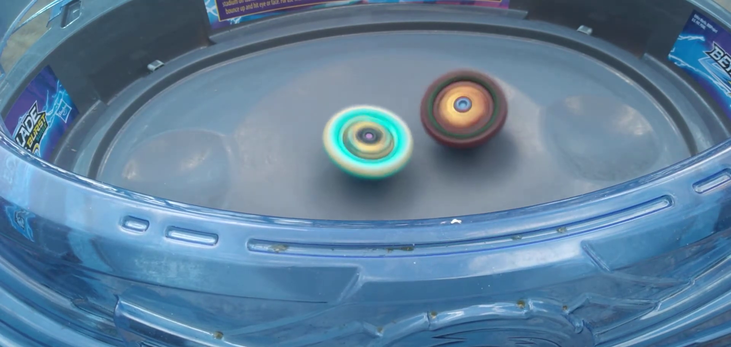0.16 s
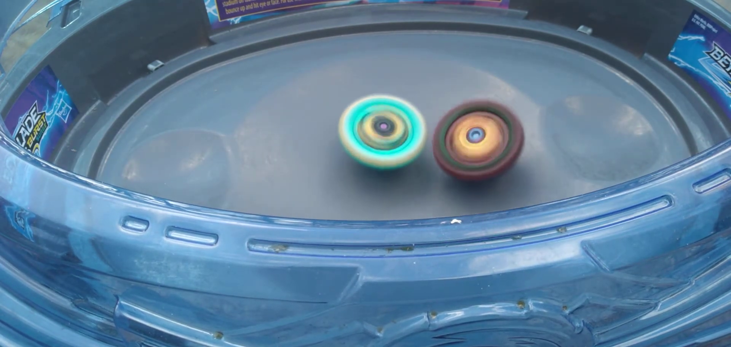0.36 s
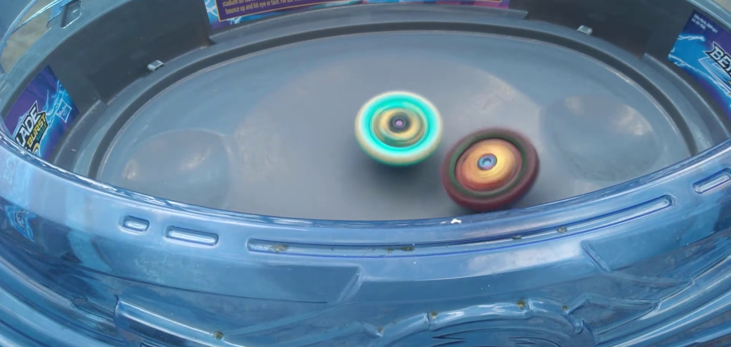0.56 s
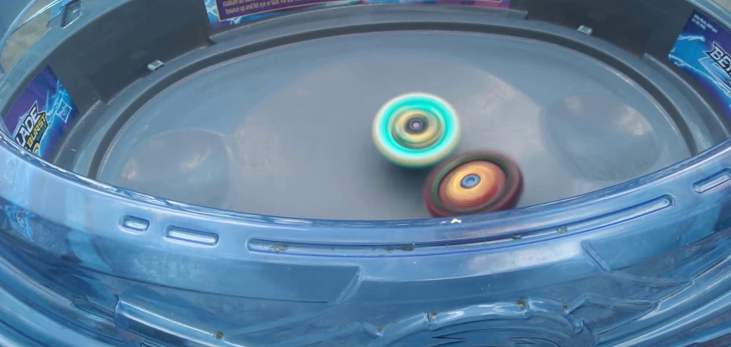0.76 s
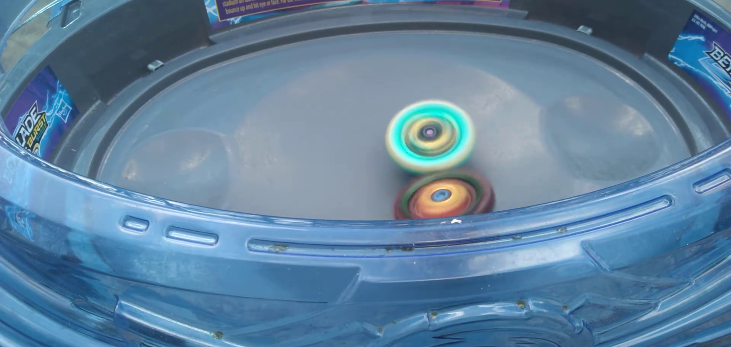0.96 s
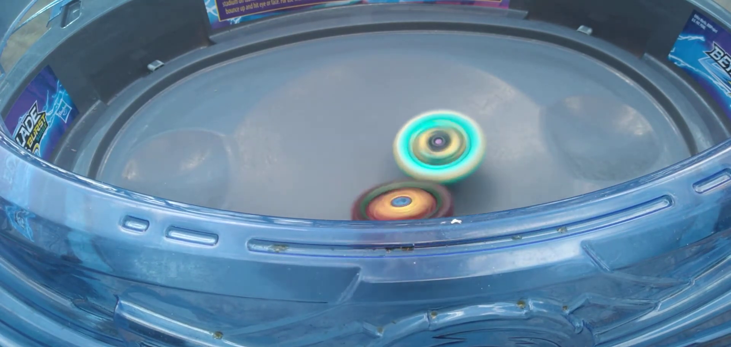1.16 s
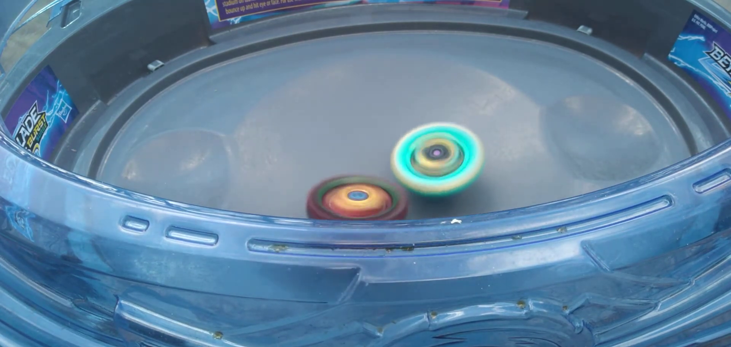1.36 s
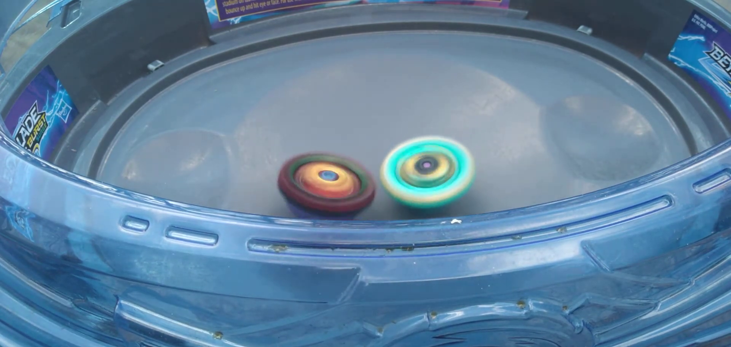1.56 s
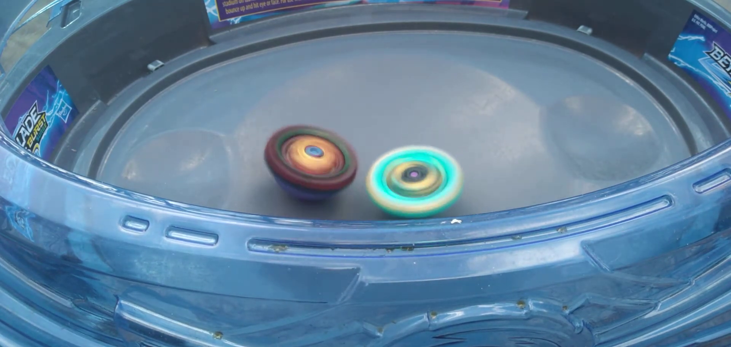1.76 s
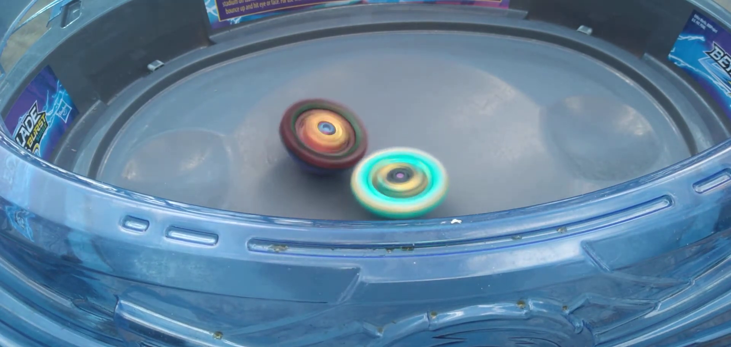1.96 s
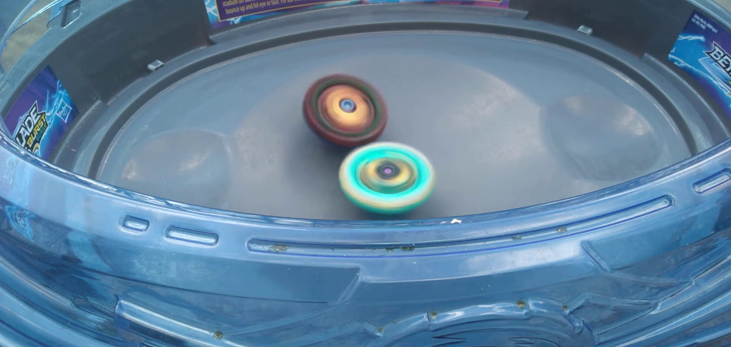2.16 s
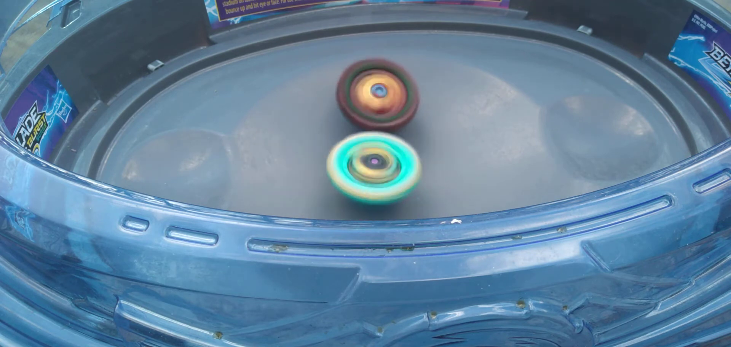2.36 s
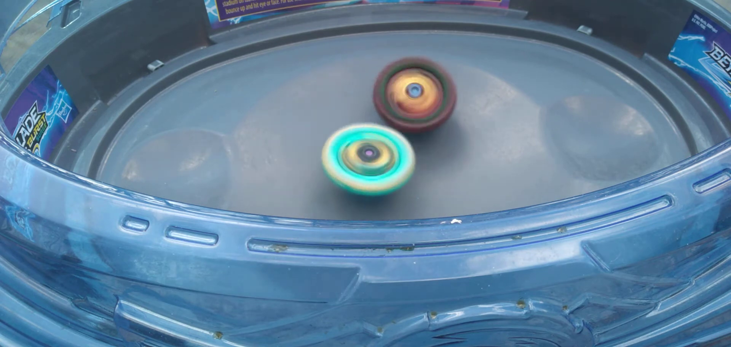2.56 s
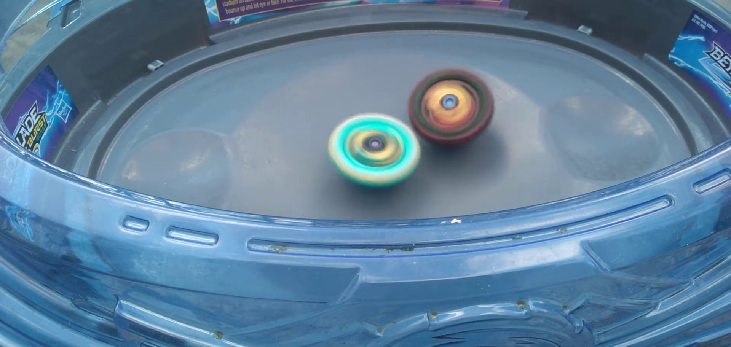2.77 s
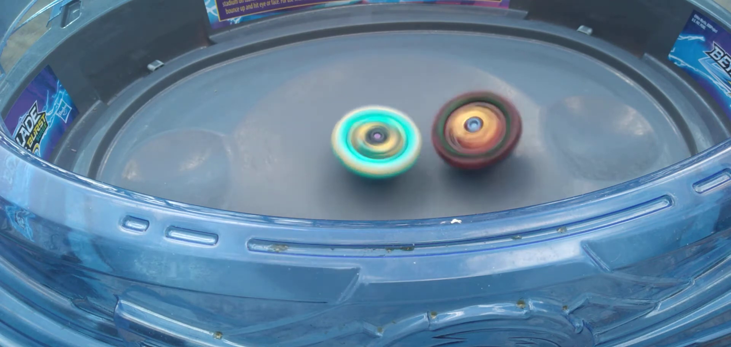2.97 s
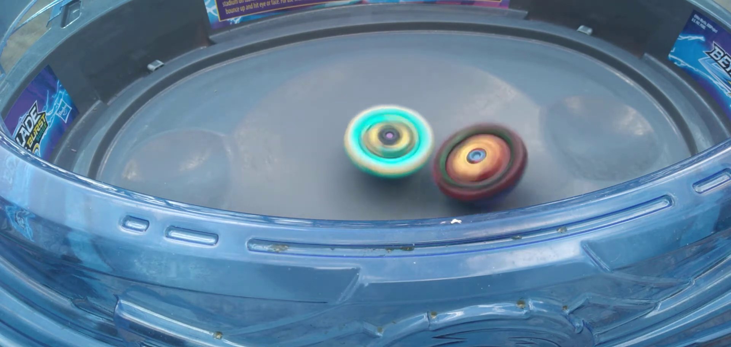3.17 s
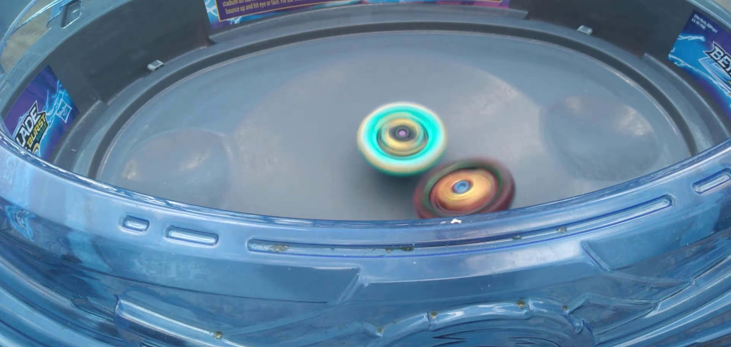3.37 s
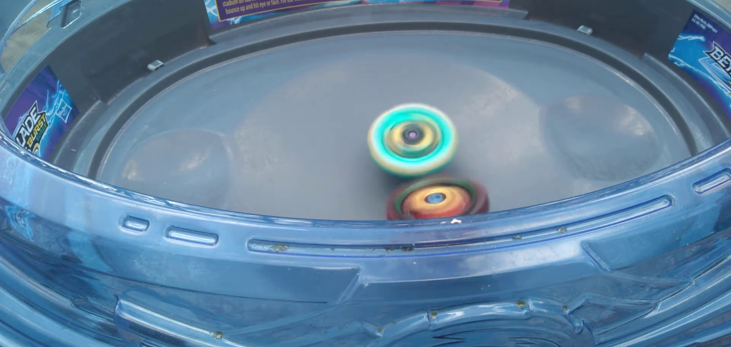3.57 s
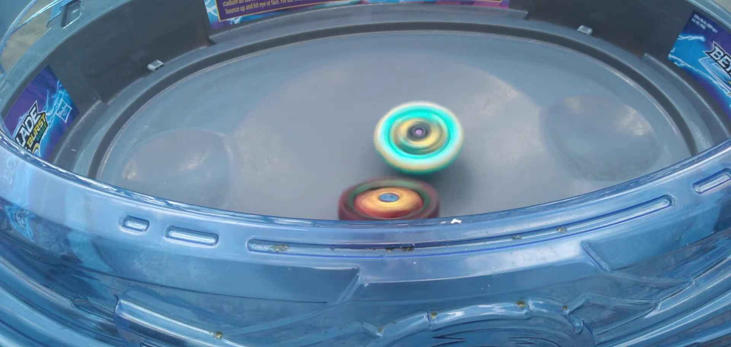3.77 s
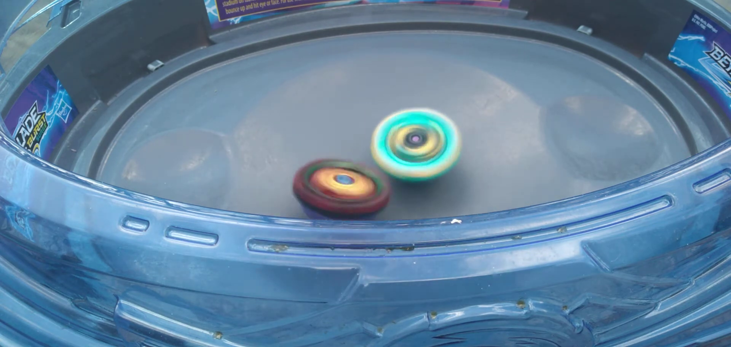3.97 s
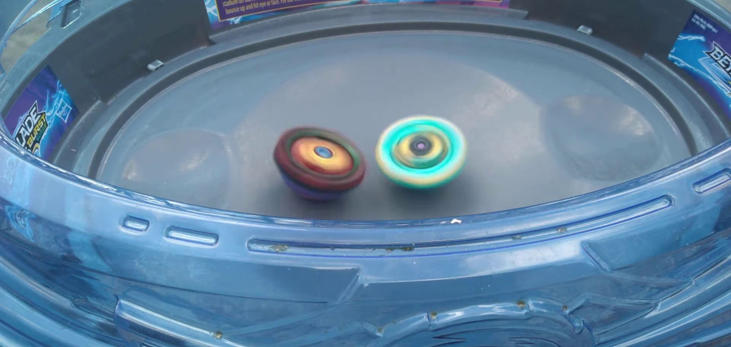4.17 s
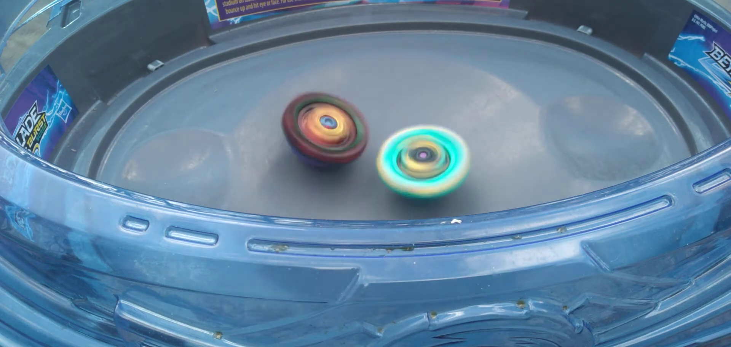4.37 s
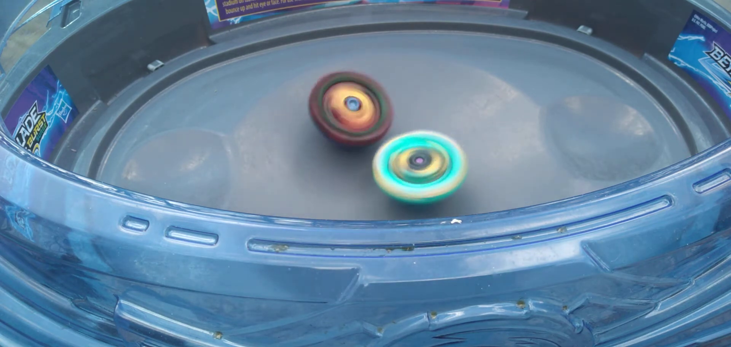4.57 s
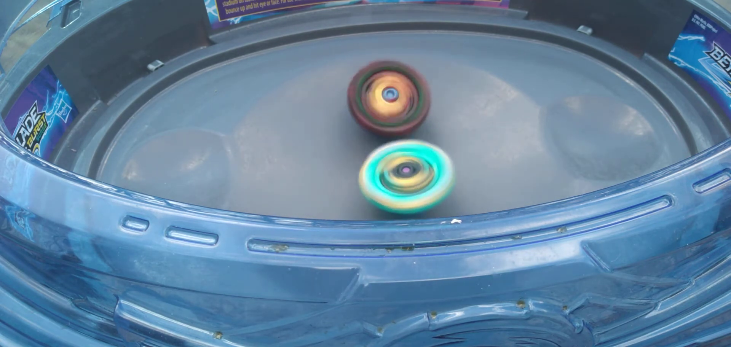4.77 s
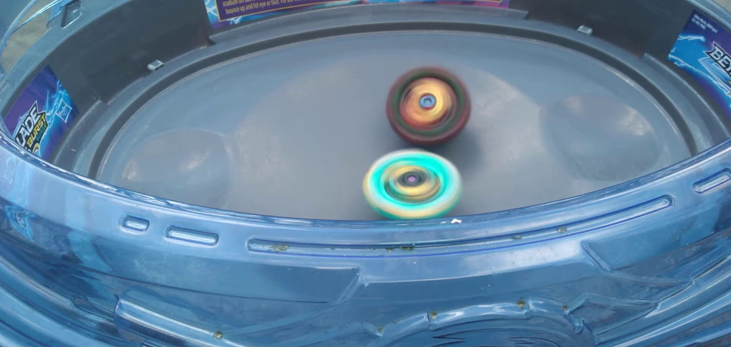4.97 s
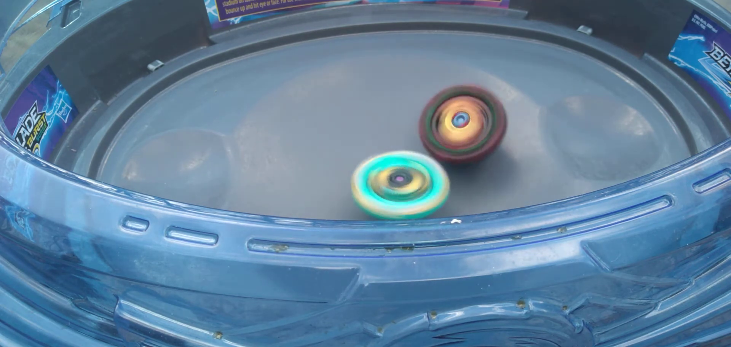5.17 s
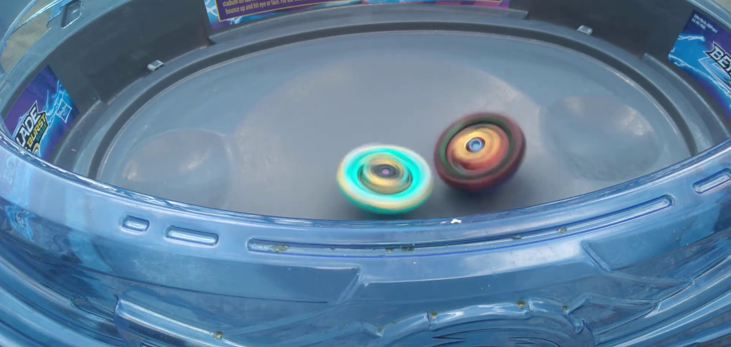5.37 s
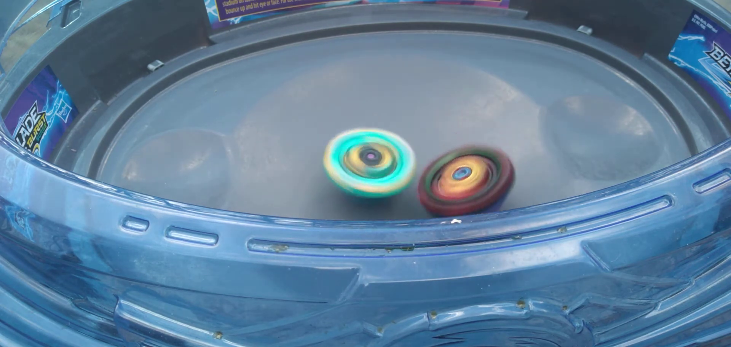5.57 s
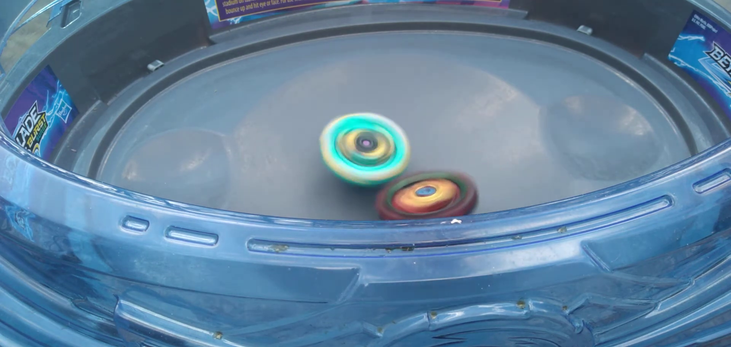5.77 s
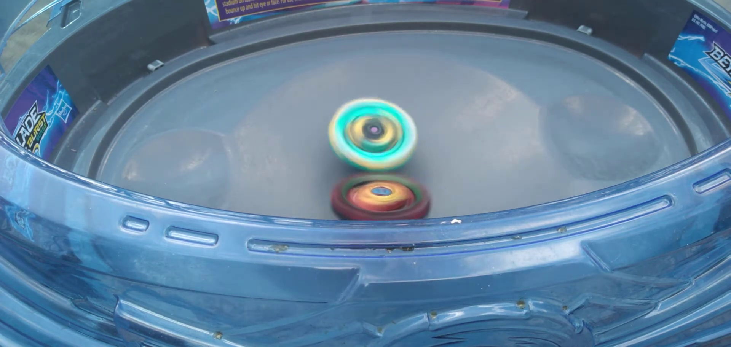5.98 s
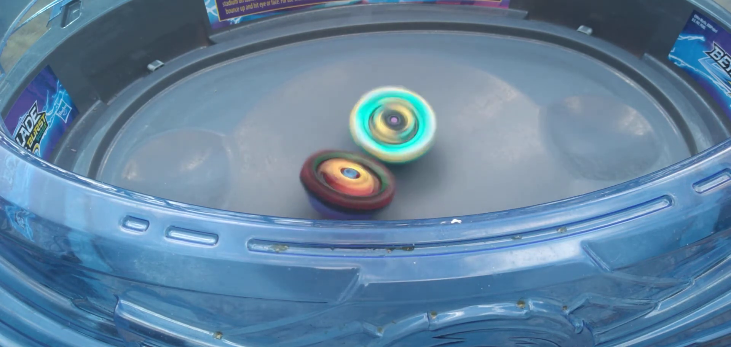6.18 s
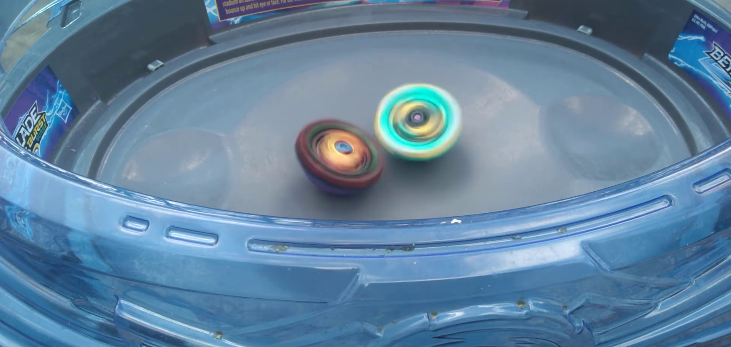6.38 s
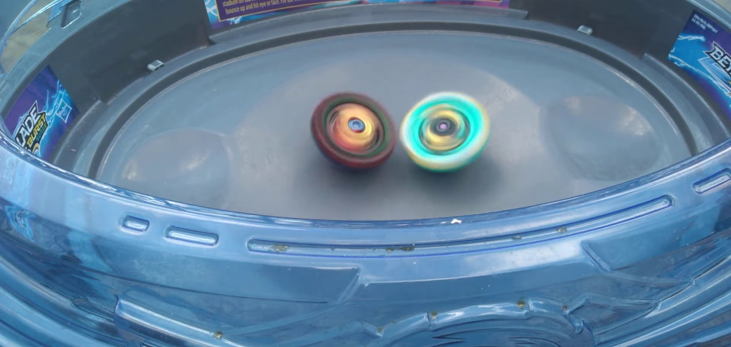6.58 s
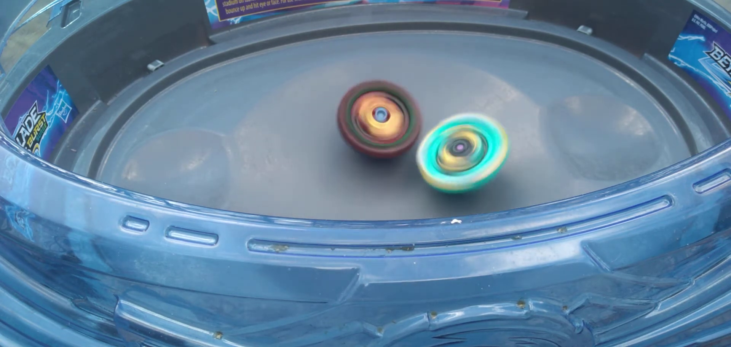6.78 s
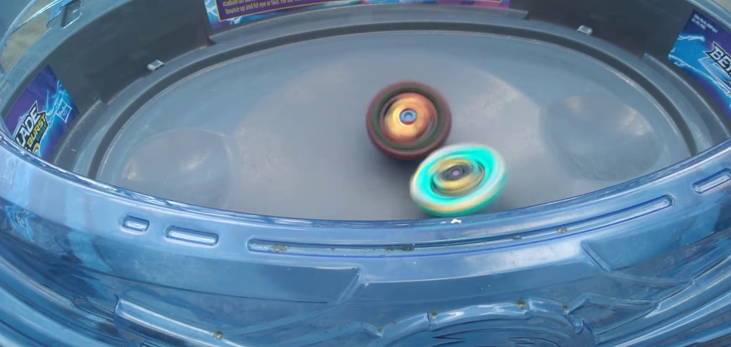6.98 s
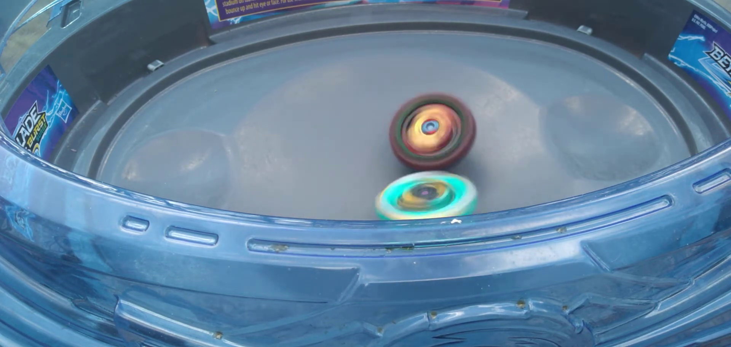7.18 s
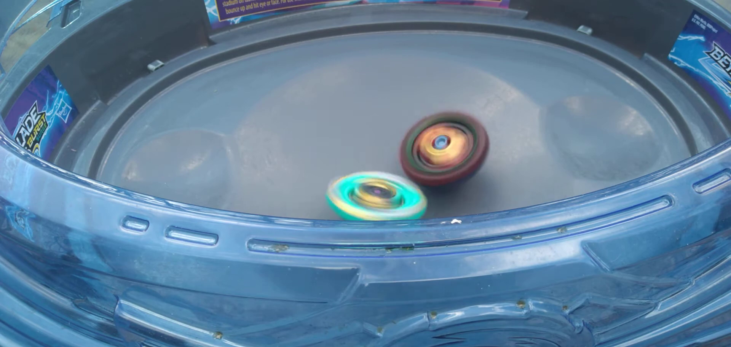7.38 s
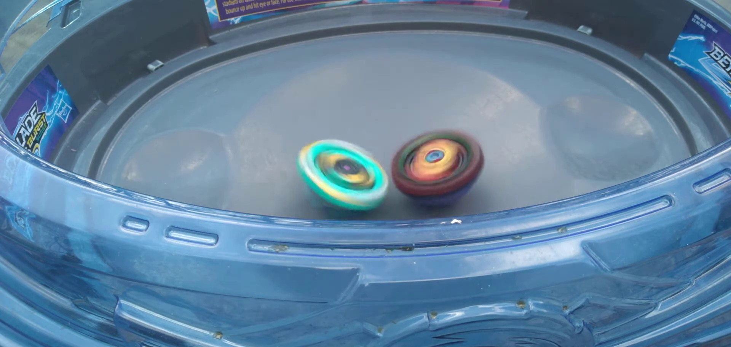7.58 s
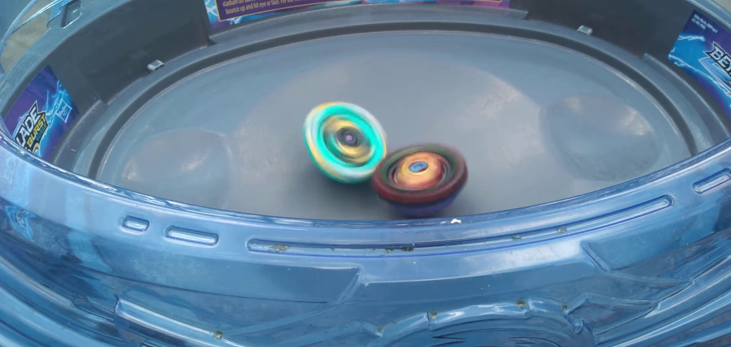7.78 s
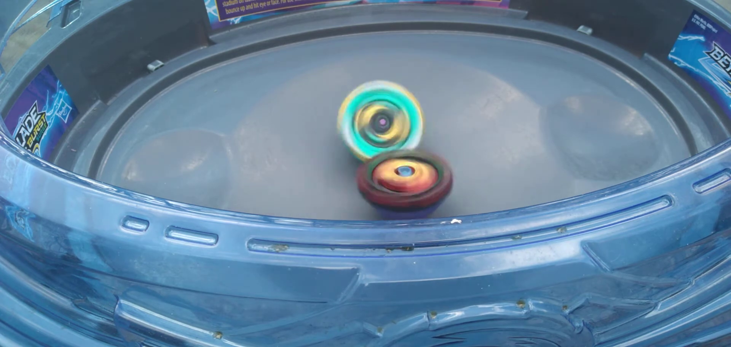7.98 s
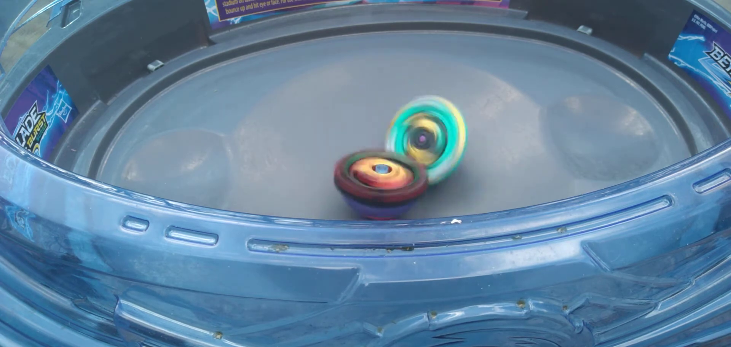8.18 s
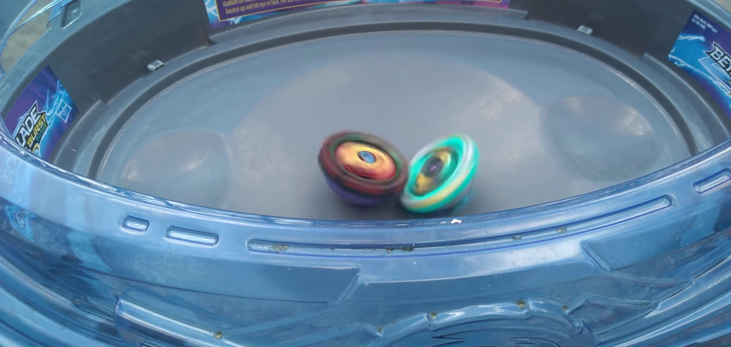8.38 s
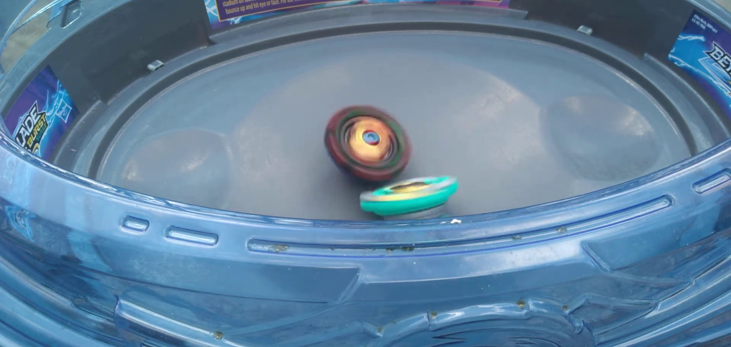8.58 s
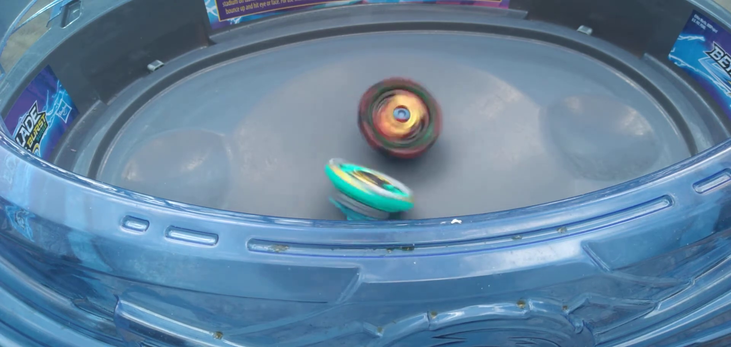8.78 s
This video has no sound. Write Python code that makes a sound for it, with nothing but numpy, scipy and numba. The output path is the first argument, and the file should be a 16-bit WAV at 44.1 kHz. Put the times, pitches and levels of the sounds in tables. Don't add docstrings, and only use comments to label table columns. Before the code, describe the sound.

Two spinning tops circle in a hollow plastic bowl, rims clashing in harsh overloaded bursts over faint throbbing scrape and low rumble, then one topples noisily.

```python
import sys
import numpy as np
from scipy import signal
from scipy.fft import rfft, irfft
from scipy.io import wavfile
from scipy.ndimage import uniform_filter1d
from numba import njit

SR = 44100
rng = np.random.default_rng(int(sys.argv[2]) if len(sys.argv) > 2 else 0)


def boost(x):
    u = np.asarray(x, float) / 20
    return 10 ** u


def pcm_store(signal):
    levels = np.round(np.clip(np.atleast_2d(signal), -1, 1) * 32767)
    wavfile.write(sys.argv[1], SR, levels.astype(np.int16).T)


N = 388962


def unit(x):
    return x / np.sqrt(np.mean(x ** 2))


def colour(x, points):
    hz, db = np.transpose(points)
    bins_hz = np.arange(1, N // 2 + 2) * SR / N
    gain = boost(np.interp(np.log(bins_hz), np.log(hz), db, left=-60, right=-60))
    return irfft(rfft(x) * unit(gain), N)


@njit
def svf(x, g, k):
    y, b, l = np.empty(len(x)), 0., 0.
    for i in range(len(x)):
        v = (b + g[i] * (x[i] - l)) / (1 + g[i] * (g[i] + k[i]))
        b = 2 * v - b
        l = l + 2 * g[i] * v
        y[i] = k[i] * v
    return y


def band(x, hz, width):
    hz = np.clip(hz, 20, SR * .45)
    return svf(x, np.tan(np.pi * hz / SR) + np.zeros(N), width / hz + np.zeros(N))


def walk(rate):
    k = max(int(SR / rate), 2)
    steps = np.repeat(rng.standard_normal(N // k + 1), k)
    return unit(uniform_filter1d(uniform_filter1d(steps, k), k)[:N])


def pair(alike):
    mid, side = rng.standard_normal((2, N))
    alike = np.clip(alike, 0, 1)
    return np.sqrt((1 + alike) / 2) * mid + np.sqrt((1 - alike) / 2) * side * np.array([[1], [-1]])


def sides(pan_db):
    return np.array([pan_db, -pan_db]) / 2


def add(out, s, shape):
    i = int(s * SR)
    out[..., i:i + shape.shape[-1]] += shape[..., :N - i]


def burst(t60_ms, rise_ms, bend=1.):
    t = np.arange(3000) / SR * 1000
    return (1 - np.exp(-t / rise_ms)) * boost(-60 * (t / t60_ms) ** bend)


# f/Hz, level/dB
FLOOR_COLOUR = [(45, -22), (75, -4), (110, 0), (230, 0), (300, -14), (400, -30)]
# f/Hz, level/dB
CAVITY_COLOUR = [(250, -26), (330, -12), (430, -2), (520, 0), (630, -6), (760, -20), (1000, -30)]


def bowl_rumble(rumble_db, rumble_hz, cavity_db):
    rumble = unit(colour([band(v, rumble_hz, 110) for v in pair(.75)], FLOOR_COLOUR))
    cavity = colour(pair(0.88), CAVITY_COLOUR)
    rumble_gain = boost(rumble_db - 2 + 1.84 * walk(12))
    cavity_gain = boost(cavity_db + 1.5 + 2.4 * walk(45))
    return rumble_gain * rumble + cavity_gain * cavity


# start t/s, end t/s, start f/Hz, end f/Hz, level/dB
SPIN_DRONES = [(0.121, .68, 109.6, 109.8, -46.5), (.9, 1.8, 110.6, 110.2, -54.5),
               (1.3, 1.85, 139.4, 136, -57), (2.0, 2.62, 171, 162, -42), (2.0, 2.65, 125, 121.4, -50.5),
               (2.1, 2.6, 207, 202.5, -51.5), (2.849, 3.65, 105.6, 104.2, -47),
               (3.699, 4.0, 104, 104.4, -43), (4.0, 5.0, 104, 104.2, -51.5), (3.697, 4.05, 71.4, 70.4, -54),
               (5.199, 5.75, 209.8, 207.4, -57.5), (6.1, 6.503, 144, 137.8, -46.5),
               (6.849, 8.82, 105.2, 102.8, -44), (7.15, 7.85, 52, 52, -55), (7.951, 8.82, 70, 69, -48.5)]


def bowl_drones():
    out = np.zeros((2, N))
    waver = 1 + .02 * walk(12)
    for start, end, start_hz, end_hz, db in SPIN_DRONES:
        span = np.arange(int((end - start) * SR)) / SR
        fade = np.clip(np.minimum(span, end - start - span) / 0.075, 0, 1)
        hz = start_hz + (end_hz - start_hz) * span / (end - start)
        hz = hz * waver[int(start * SR):][:len(span)]
        side_phase = np.array([[0], [.5]])
        phase = 2 * np.pi * np.cumsum(hz) / SR + 7 * rng.random() + side_phase
        add(out, start, boost(db + 4.5) * fade * np.sin(phase))
    return out * boost(3.5 * walk(16))


# t/s, peak level/dB, f/Hz
BOWL_BOOMS = [(0.889, -40, 129), (1.738, -38, 156), (2.919, -39, 94.2), (3.712, -32.5, 96.9),
              (4.507, -33, 141), (4.849, -30.5, 183), (6.699, -17.5, 78.1), (6.904, -23.5, 124),
              (7.079, -24, 76), (7.859, -28, 180), (8.479, -26, 129), (8.589, -26, 156), (8.729, -25, 151),
              (8.767, -22, 124), (8.802, -20, 132)]


def bowl_booms():
    out = np.zeros((2, N))
    t = np.arange(3000) / SR
    side_phase = np.array([[0], [.9]])
    for s, db, hz in BOWL_BOOMS:
        turns = np.cumsum(hz * (0.707 + 1.15 * np.exp(-t / 0.0046))) / SR
        add(out, s, boost(db + 5.5) * burst(84, .5) * np.sin(2 * np.pi * turns + side_phase))
    return out


# t/s, turns per second/Hz, throb depth level/dB
TIP_SPIN = [
    (0, 50, 0.5),
    (1.3, 43, 6),
    (2.3, 41, 5),
    (3.3, 36.7, 6.5),
    (4, 34, 8),
    (5.3, 31.5, 10.5),
    (6.5, 28, 11),
    (7.8, 23, 6),
    (8.82, 20.6, 6),
]
# f/Hz, width f/Hz, level/dB
TOP_MODES = [(1290, 110, -20), (2350, 180, -15), (3500, 260, -10)]
# f/Hz, level/dB
RUB_COLOUR = [(600, -26), (800, -9), (1050, -1), (1800, -3), (3000, -1), (5200, -1.5), (7000, -4)]
# f/Hz, level/dB
RIM_COLOUR = [(2000, -27), (4000, -19.5), (5500, -18), (7000, -12), (9000, -5.5), (11000, -10.5),
              (13000, -14), (16000, -17)]


def tips(scrape_db, rub_db, pan_db):
    s, turns, depth_db = np.transpose(TIP_SPIN)
    t = np.arange(N) / SR
    turn_hz = np.interp(t, s, turns) * (1 + 0.03014 * walk(6))
    turn = 2 * np.pi * np.cumsum(turn_hz) / SR
    late = np.clip((t - 7.4) / .5, 0, 1)
    early_throb = 0.65 * np.cos(turn) + 0.56 * np.cos(2 * turn + 1.56 * walk(5))
    throb = (1 - late) * early_throb + late * np.cos(3 * turn)
    grit_db = np.interp(t, s, depth_db) * throb + 3.03 * walk(90) + 2.43 * walk(500)
    scrape = boost(scrape_db + grit_db - 7.5 + sides(pan_db)) * pair(0.084)
    rub = boost(rub_db + .5 * grit_db + 1.8 * walk(20) + 2) * pair(0.23)
    out = colour(scrape, RIM_COLOUR) + boost(-3) * colour(rub, RUB_COLOUR)
    for hz, width, db in TOP_MODES:
        gain = boost(db + 5.0 * walk(25) - 6 * late) * np.sqrt(SR / np.pi / width)
        out = out + gain * [band(v, hz, width) for v in rub]
    return out


# t/s, level/dB
TIP_SQUEAKS = [
    (4.69, -45),
    (4.722, -37),
    (4.757, -28.5),
    (4.786, -41),
    (4.8, -43),
]


def squeaks():
    out = np.zeros(N)
    t = np.arange(3000) / SR
    ring = np.sin(2 * np.pi * 1290 * t) + 0.56 * np.sin(2 * np.pi * 2350 * t)
    for s, db in TIP_SQUEAKS:
        add(out, s, boost(db) * burst(47, 1.2) * ring)
    return out


# t/s, peak level/dB
FLOOR_DRUMS = [(8.038, -21), (8.098, -26), (8.459, -23), (8.469, -22), (8.551, -27), (8.586, -27),
               (8.624, -31), (8.656, -24), (8.684, -19), (8.728, -27), (8.763, -18), (8.799, -26)]


def drums():
    out = np.zeros(N)
    t = np.arange(3000) / SR
    for s, db in FLOOR_DRUMS:
        hz = 470 * (1 + .07 * rng.standard_normal())
        add(out, s, boost(db + 3) * burst(60, 1.5) * np.sin(2 * np.pi * hz * t))
    return out


# t/s, level/dB, fade to -60 dB t/ms, ring below it level/dB
WALL_GRAZES = [
    (1.117, -26, 50, -10),
    (1.1295, -12, 24, -13),
    (1.147, -28, 20, -10),
    (1.163, -33, 40, -4),
    (1.181, -24, 20, -25),
    (1.2055, -17, 30, -24),
    (1.227, -19, 32, -26),
    (1.246, -24, 50, -24),
    (1.27, -34, 60, -8),
    (1.295, -34, 25, -8),
]
# f/Hz, level/dB
WALL_COLOUR = [(2500, -25), (4500, -16), (6200, 0), (7800, -2), (9500, -8), (12000, -10), (16000, -20)]


def grazes():
    scrape, ring = np.zeros((2, N))
    for s, db, t60_ms, ring_db in WALL_GRAZES:
        add(scrape, s, boost(db) * burst(t60_ms, .6))
        add(ring, s, boost(db + ring_db) * burst(110, .8))
    scrape = colour(scrape * boost(3.0 * walk(800)) * pair(.2), WALL_COLOUR)
    ring = ring * [unit(band(v, 3410, 70)) for v in pair(.5)]
    return boost(-3) * scrape + boost(-3) * ring


# t/s, blow level/dB, chatter length t/ms, hollow knock relative to blow level/dB
RIM_CLASHES = [(0.7555, 0.5, 25, -32), (0.78, 0.5, 39, -25), (0.865, -13.5, 24, -17),
               (0.891, 6.5, 30.5, -36.5), (0.9096, 0, 21, -38), (0.9207, -3, 27, -28),
               (1.736, -15, 32, -34), (1.7395, 5, 40, -28), (1.754, -32, 27, -31), (2.0477, -4, 28, -41),
               (2.1411, -3, 29, -37), (2.1502, 5, 25, -34), (2.368, -23.5, 22, -35), (2.3778, -16, 13, -32),
               (2.5965, 3, 25, -28), (2.6015, 9, 33, -32), (2.6196, 7, 32, -31), (2.9307, -1, 69, -32),
               (2.9397, 5.5, 33, -32), (3.4189, -4.5, 46, -33), (3.4237, 5.5, 63, -35), (3.441, 2, 45, -42),
               (3.6984, 0.5, 34, -32), (3.7094, 5.5, 33, -35), (3.7205, 8, 33, -25.5),
               (4.5106, 5, 62, -29.5), (4.5342, -33, 20, -23), (4.7584, -19.5, 15.5, -3),
               (4.833, 5, 27, -32.5), (4.845, 5, 48, -28), (4.857, 4.5, 35, -28), (5.2214, 3, 27, -33),
               (5.3083, 0.5, 27, -45), (5.486, -5.5, 37, -24), (5.5471, 2, 38, -34), (5.562, -4, 20, -36),
               (5.6207, 6, 40, -31), (5.7307, -4, 38, -34), (5.7434, 3.5, 45, -27.5),
               (5.7584, -2.5, 21, -42), (5.8557, -6, 38, -39), (5.8698, -9, 30, -40),
               (5.8837, 3.5, 30.6, -30), (5.8965, 3, 34.5, -31), (5.9337, -8, 15, -38),
               (6.0737, -0.5, 43, -23.5), (6.176, -4.5, 31, -32), (6.1899, 2, 47, -28),
               (6.204, 1.5, 36, -26), (6.2434, -4.5, 16.5, -44), (6.3222, 5, 32, -28),
               (6.392, 4, 25.3, -33), (6.403, 8, 31, -27), (6.4737, -1.5, 19, -38), (6.5032, 3, 53, -27),
               (6.51, 6, 30, -33), (6.6833, -14, 27, -36), (6.6897, 0.5, 31.4, -36), (6.6996, 5, 57, -19.5),
               (6.7207, -3, 39, -33), (6.8335, 6, 32, -31), (6.8489, 3, 28, -33), (6.8647, -2, 45, -25),
               (6.8985, 0, 77, -22), (6.9063, 3.5, 45, -29), (6.9238, -1, 22, -27), (6.9393, 2, 37, -31),
               (6.9984, 0, 58, -25.5), (7.0345, -7, 28, -34), (7.0663, 6.5, 43, -34),
               (7.0744, 1.5, 38, -21), (7.3269, -0.5, 29, -21.5), (7.3438, 3, 47, -25.5),
               (7.4081, 2, 37, -25.5), (7.4268, 2, 34, -28.5), (7.474, -5, 36, -35), (7.4916, 3.5, 37, -34),
               (7.5617, 3, 22, -33), (7.5663, 3.5, 30, -34), (7.613, 9.5, 29, -36), (7.6626, 7, 34, -31.5),
               (7.678, -26, 29, -25), (7.758, 1, 28, -37), (7.7681, 5, 42, -28.5), (7.8087, 1.5, 32, -23.5),
               (7.821, 4.5, 33, -32), (7.8585, 5, 52, -26.5), (8.0332, 1, 37, -19), (8.0509, -15, 27, -15),
               (8.0961, -9.5, 26, -7.5), (8.2138, -19, 31, -23), (8.2166, -13, 34, -21),
               (8.237, 10, 25, -28), (8.2474, -14, 26, -18), (8.4524, 3.5, 58, -25), (8.4683, -12, 59, -10),
               (8.6848, -9.5, 71, -15), (8.7616, -2.5, 19, -23), (8.8, 0, 21, -21), (8.8105, -4, 11, -22)]
# t/s, level/dB
LOOSE_TICKS = [(0.14, -18.5), (0.52, -28), (0.541, -21), (0.667, -27), (0.943, -13), (0.958, -14.5),
               (1.353, -24), (1.364, -20), (1.373, -26), (1.432, -30), (1.954, -26), (2.091, -17),
               (2.303, -26), (2.309, -20), (2.323, -26), (2.346, -21), (2.354, -21), (2.409, -20),
               (2.645, -32), (2.722, -18), (3.044, -16.5), (3.146, -28), (3.172, -29), (3.686, -21),
               (4.145, -25), (4.387, -21.5), (4.664, -24), (4.694, -20), (4.822, -17), (5.11, -25),
               (5.141, -24), (5.341, -22), (5.405, -21), (6.062, -30), (6.134, -26), (6.466, -24),
               (6.658, -32), (7.263, -19), (7.313, -23)]
# f/Hz, level/dB
KNOCK_COLOUR = [(60, -14), (150, -6), (300, -5), (500, -2), (800, -5), (1100, 4), (1800, -1.5), (3000, -1),
                (4500, -13.5), (7000, -12)]


def clashes(pan_db):
    rim, knock = np.zeros((2, N))
    for s, blow_db, length_ms, knock_db in RIM_CLASHES:
        add(rim, s - .0035, boost(blow_db - 24) * burst(12, 1.5))
        chatter_and_tail = burst(.55 * length_ms, .9, 1.6) + boost(-24) * burst(70, 3.)
        add(rim, s - .001, boost(blow_db) * chatter_and_tail)
        add(knock, s - .001, boost(blow_db + knock_db) * burst(.45 * length_ms, .6, 1.4))
    for s, tick_db in LOOSE_TICKS:
        add(rim, s - .001, boost(tick_db - 3) * burst(26.3, 0.63))
    chatter = boost(3.0 * walk(900))
    rim = colour(rim * chatter * boost(sides(pan_db)) * pair(.1), RIM_COLOUR)
    knock = colour(knock * boost(4.0 * walk(600)) * pair(.3), KNOCK_COLOUR)
    spot_hz = 1700 * 2 ** (.8 * walk(25))
    knock = knock + 1.5 * np.array([band(v, spot_hz, 500) for v in knock])
    return boost(-7) * rim + boost(-3) * knock


# t/s, scrape level/dB, rumble level/dB, rumble centre f/Hz,
# cavity level/dB, rub level/dB, left minus right level/dB
ROLLING = [(0.0, -45, -43, 176, -51, -53, -5), (0.2, -42, -43, 131, -52, -52, -6),
           (0.45, -46, -44, 120, -53, -54, -6), (0.7, -42, -49, 140, -51, -51, -7),
           (0.95, -37, -50, 180, -49, -53, -5), (1.1, -43, -50, 165, -50, -51, -3),
           (1.3, -42, -50, 125, -51, -53, 0), (1.55, -45, -50, 132, -55, -57, 0),
           (1.8, -43, -47, 196, -55, -57, -3.5), (2.0, -43, -48, 180, -59, -58, -6),
           (2.2, -45, -39.5, 203, -57, -56, -5), (2.35, -44, -41, 204, -55, -56, -5),
           (2.5, -47, -42, 199, -54, -59, -5), (2.75, -43, -48, 200, -53, -54, -6),
           (3.0, -45, -46, 126, -51, -54, -7), (3.25, -44, -47, 109, -47, -56, -8),
           (3.5, -47, -46, 115, -48, -54, -5), (3.8, -44, -42, 116, -46, -53, 0),
           (4.0, -44, -48, 135, -49, -55, -1), (4.2, -44, -47, 166, -52, -60, -5),
           (4.4, -44, -45, 150, -55, -62, -6), (4.65, -44, -45, 164, -51, -53, 0),
           (4.9, -44, -47, 164, -51, -56, -6), (5.1, -44, -51, 188, -49, -57, -7),
           (5.35, -41, -54, 198, -50, -57, -10), (5.6, -46, -57, 187, -46, -55, -6),
           (5.8, -48, -60, 186, -48, -55, -3), (6.0, -43, -57, 133, -47, -53, -3),
           (6.15, -45, -48, 141, -50, -56, 0), (6.4, -45, -43, 172, -50, -56, -2),
           (6.6, -43, -43, 109, -49, -53, -6), (6.8, -43.5, -41, 149, -48, -52, -6),
           (7.0, -45, -39, 112, -48, -51, -5), (7.2, -44, -41, 113, -46, -48, -7),
           (7.45, -41, -43, 118, -48, -50, -3), (7.7, -39, -38, 140, -50, -49, -3),
           (7.82, -33, -39, 133, -47, -41, -2), (7.92, -31, -42.5, 124, -45, -38, -3),
           (8.15, -26, -41, 111, -41, -36, -7), (8.4, -28, -37, 123, -40, -35, -3),
           (8.6, -25, -37, 142, -36, -32, -4), (8.82, -28, -34, 151, -35, -37, -3)]


def scene():
    s, *columns = np.transpose(ROLLING)
    t = np.arange(N) / SR
    scrape_db, rumble_db, rumble_hz, cavity_db, rub_db, pan_db = (np.interp(t, s, c) for c in columns)
    pan_db = pan_db + 4
    bowl = bowl_rumble(rumble_db, rumble_hz, cavity_db) + bowl_drones() + bowl_booms()
    bowl = bowl * boost([[-1.2], [1.2]])
    return bowl + tips(scrape_db, rub_db, pan_db) + squeaks() + drums() + grazes() + clashes(pan_db)


def band_limit(x):
    return signal.sosfilt(signal.butter(12, 16610, fs=SR, output="sos"), x)


# f/Hz, width f/Hz, level/dB
MIC_PORTS = [(8250, 2300, 6.5), (9516, 1710, 11)]


def record(dry):
    ports = np.array([v + (boost(db) - 1) * band(v, hz, width)
                      for v, (hz, width, db) in zip(dry, MIC_PORTS)])
    ports = signal.sosfilt(signal.butter(2, 55, "high", fs=SR, output="sos"), ports)
    clipped = np.clip(ports, -.93, .93)
    top_cut = signal.ellip(8, .1, 60, 15750, fs=SR, output="sos")
    mix = np.clip(signal.sosfiltfilt(top_cut, clipped), -1, 1)
    return band_limit(mix)


dry = scene()
out = record(dry)
pcm_store(out)
```